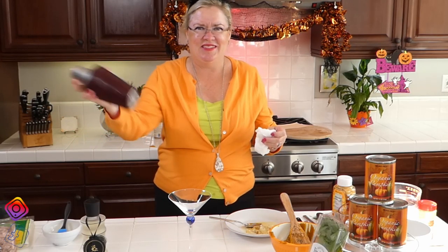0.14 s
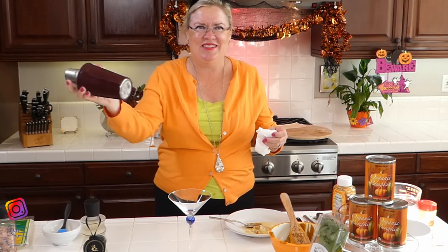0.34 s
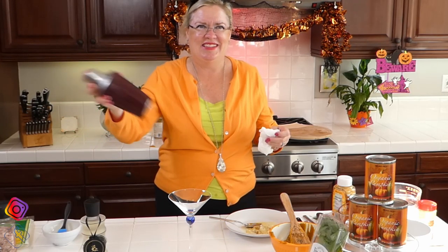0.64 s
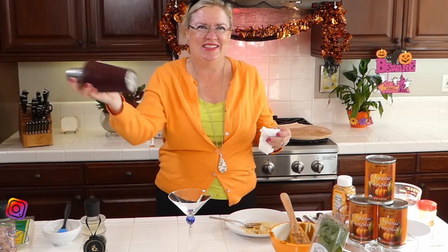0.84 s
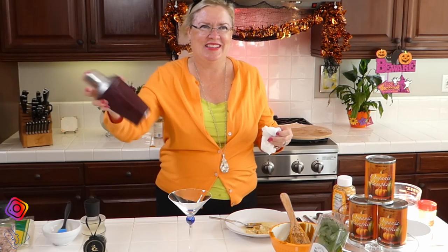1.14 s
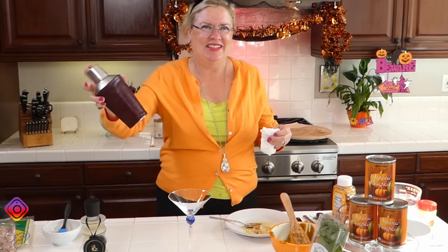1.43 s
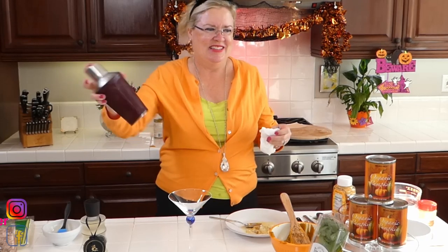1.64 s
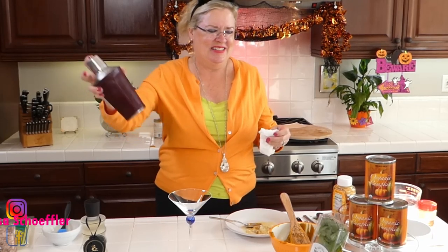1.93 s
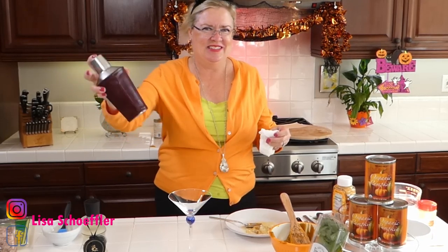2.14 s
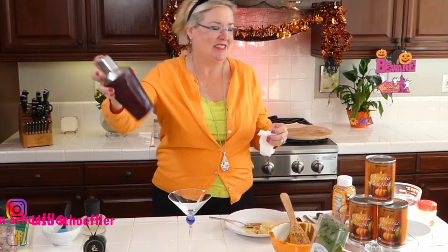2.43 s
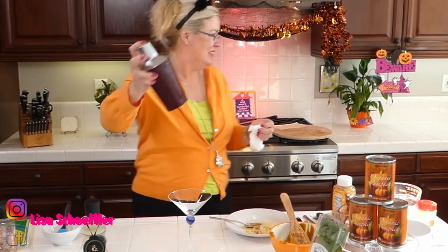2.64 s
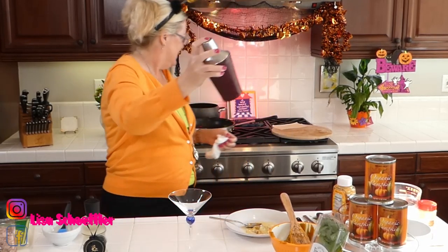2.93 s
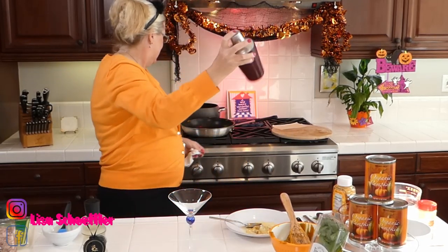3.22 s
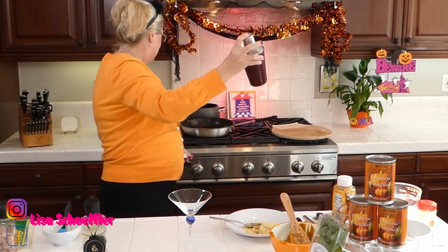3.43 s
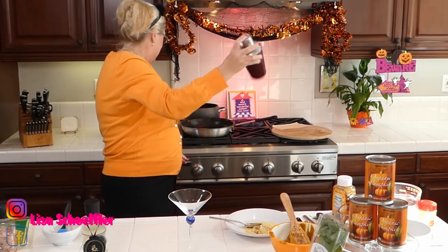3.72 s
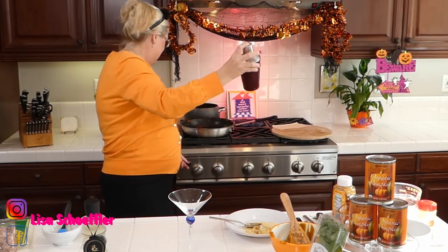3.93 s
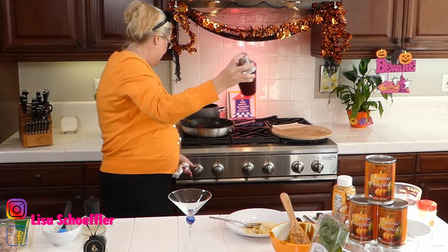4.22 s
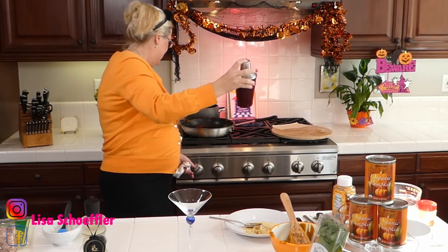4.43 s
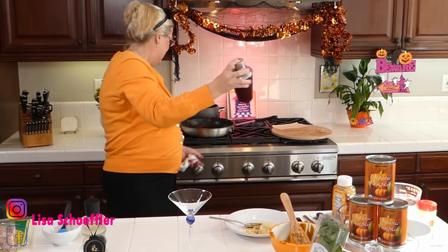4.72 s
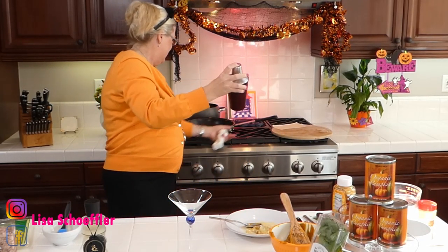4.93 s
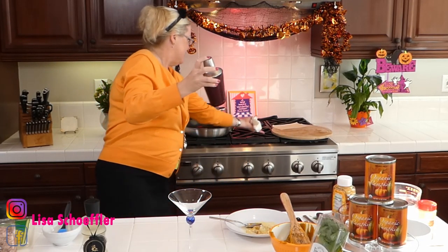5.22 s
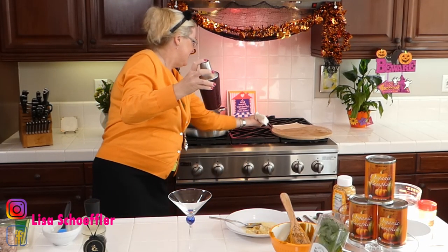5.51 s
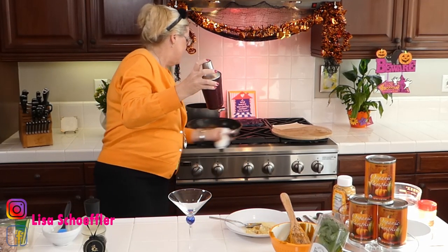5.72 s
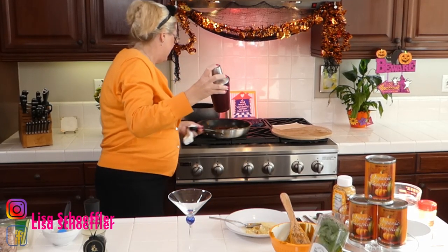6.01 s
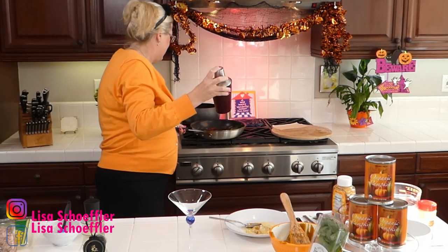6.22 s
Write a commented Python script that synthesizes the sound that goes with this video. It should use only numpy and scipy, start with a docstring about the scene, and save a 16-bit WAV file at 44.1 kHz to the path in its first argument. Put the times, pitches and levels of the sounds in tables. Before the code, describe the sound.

Steady, rapid ice shaking: crunchy clatter alternating between the ends of a cup, sharp knocks against the wall, crisp lid cracks and duller base thuds. It weakens just after five seconds, giving way to a metal pan dragged and bumped on stove bars, ringing and grating until the end. Lively tiled kitchen, low appliance noise underneath, heard a little way off by a camera's stereo microphones.

```python
"""From the start, ice and drink are thrown from end to end of a cocktail shaker, two strokes a shake:
chips patter densely as random contacts ringing wall, lid and base, and cubes knock as short damped tones.
Near the end a frying pan is dragged and bumped over the stove grate; grit and blows drive its modes and rim.
Throughout, a hard tiled kitchen answers with echoes of decaying noise and appliances hum as shaped noise;
a camera's two microphones pick it up with unequally scattered treble and a steep top cut."""
import sys
import numpy as np
from scipy import signal
from scipy.fft import rfft, irfft
from scipy.io import wavfile

SR = 44100
rng = np.random.default_rng(int(sys.argv[2]) if len(sys.argv) > 2 else 0)


def unload_wav(signal):
    """Save mono or channel-first audio to the path in sys.argv[1] as 16-bit WAV at rate SR, clipped to [-1, 1]."""
    wavfile.write(
        sys.argv[1],
        SR,
        np.round(np.clip(np.atleast_2d(signal).T, -1, 1) * 32767).astype(np.int16),
    )


N = 280917  # length [samples]
TIME = np.arange(N) / SR  # [s]

# resonances of the shaker wall: (centre [Hz], width [Hz], level [dB])
WALL_MODES = [(1500, 740, -9), (2130, 755, -0.5), (3160, 630, -2), (4280, 1230, -6)]
# resonances of the lid: (centre [Hz], width [Hz], level [dB])
LID_MODES = [(5580, 5340, -2), (8820, 2200, 1.5), (9590, 1300, 2), (12900, 5300, -13)]
# resonances of the wet base: (centre [Hz], width [Hz], level [dB])
BASE_MODES = [(601, 112, -1.5), (870, 308, 7), (987, 325, 8), (1212, 284, 1)]


def patter():
    """The same contacts shake the whole cup; each part also has contacts of its own."""
    shared = clicks(2500, 0.84)
    wall_ring = unit(ring(shared + 0.88 * clicks(3000, 1.75), WALL_MODES))
    wall = unit(wall_ring + 0.49 * chips())
    lid = unit(ring(shared + 1.87 * clicks(2500, 0.55), LID_MODES))
    base = unit(ring(1.13 * shared + clicks(400, 1.2), BASE_MODES))
    return np.sum(throws() * [wall, lid, base], axis=0)


# throws of the ice to one end of the cup: (first chips land [s], time to the densest patter [s],
# wall level [dB], lid brightness re wall [dB], base thud re wall [dB])
STROKES = [(0, 0.0025, -29.5, -7.5, -14.5), (0.043, 0.029, -29.5, -10.5, -4.5),
           (.181, 0.037, -28.5, -3.5, -9.5), (.27, 0.041, -28, -15, -8), (0.427, 0.027, -27, -6, -16.5),
           (.52, 0.026, -26.5, -11.5, -8.5), (.664, 0.015, -31.5, 2.5, -11), (.75, 0.041, -29, -11.5, -7.5),
           (0.907, 0.018, -27.5, -5, -12), (1.01, 0.018, -30, -7.5, -7.5), (1.147, 0.015, -31, -1.5, -15),
           (1.249, 0.02, -31, -13, -8), (1.385, 0.03, -31.5, -6.5, -10), (1.47, 0.055, -29, -9, -7),
           (1.636, 0.019, -33.5, 0.5, -11.5), (1.729, 0.025, -31.5, -10.5, -6.5),
           (1.857, 0.056, -31, -5.5, -9.5), (1.967, 0.027, -28.5, -9.5, -7.5),
           (2.099, 0.058, -30, -5, -12.5), (2.21, 0.038, -30.5, -13, -5), (2.35, 0.036, -28.5, -6.5, -13.5),
           (2.44, 0.03, -29, -8.5, -8), (2.605, 0.022, -28.5, -4, -23), (2.7, 0.033, -30, -12, -5),
           (2.855, 0.038, -33, -1.5, -11), (2.95, 0.044, -30, -10.5, -6), (3.138, 0.018, -36, -5.5, -10),
           (3.19, 0.076, -29, -12, -5.5), (3.399, 0.021, -32.5, -10, -12), (3.461, 0.043, -28, -11.5, -7.5),
           (3.64, 0.045, -34, -8.5, -12), (3.7, 0.064, -32, -12.5, -7.5), (3.856, 0.084, -29.5, -6.5, -12),
           (3.97, 0.032, -26.5, -11, -8.5), (4.136, 0.02, -30, -6.5, -8.5),
           (4.199, 0.037, -29, -11.5, -7.5), (4.382, 0.011, -33.5, -0.5, -10),
           (4.44, 0.062, -28.5, -12.5, -5.5), (4.62, .04, -31, -10, -12), (4.711, 0.047, -28, -7.5, -10.5),
           (4.891, 0.04, -34, -10, -10), (4.96, 0.059, -31.5, -10.5, -7.5), (5.09, 0.024, -37.5, -19, -6),
           (5.258, 0.0056, -46, -2.5, -24), (5.35, 0.011, -51, -2.5, -18)]
# how fast the patter dies away: (wall [dB/s], lid [dB/s], base [dB/s])
FALL_DB_PER_S = (123.5, 151, 132)
RISE_DB, HOLD_S = 6, 0.004  # climb from first chips to densest patter; how long it stays there


def throws():
    """Patter level on wall, lid and base: each throw climbs, holds, then dies away at a steady rate."""
    power = np.zeros((3, N))
    for start_s, rise_s, wall_db, lid_db, base_db in STROKES:
        i, rise_s = int(start_s * SR), max(rise_s, .003)
        t = TIME[:min(SR // 2, N - i)]
        peak_db = np.array([[wall_db], [wall_db + lid_db], [wall_db + base_db]])
        climb_db = RISE_DB * np.maximum(1 - t / rise_s, 0)
        fall_db = np.outer(FALL_DB_PER_S, np.maximum(t - rise_s - HOLD_S, 0))
        power[:, i:i + len(t)] += undb(peak_db - climb_db - fall_db) ** 2
    return np.sqrt(power)  # overlapping throws add as power


CHIP_LOW_HZ, CHIP_HIGH_HZ, CHIP_Q = 1300, 5216, 14.3  # pitch range of loose chips; sharpness


def chips(count=14):
    """Loose pieces of ice, each with a pitch of its own, tick now and then."""
    total = 0
    for hz in np.geomspace(CHIP_LOW_HZ, CHIP_HIGH_HZ, count):
        level_db = -3 * np.log2(hz / 2000)  # higher pieces are weaker, 3 dB an octave
        total = total + ring(clicks(70, 2.3), [(hz, hz / CHIP_Q, level_db)])
    return unit(total)


# cube knocks on wall and lid: (time [s], level [dB], pitch [Hz], lid crack re knock [dB])
KNOCKS = [(.019, -22, 2340, -23), (.0538, -22, 2130, -15), (.0717, -18, 2130, -7), (.0796, -15, 2300, -4.5),
          (.186, -24, 2990, -3), (.2079, -23, 1980, -9), (.245, -15, 3060, -12), (.429, -37, 2000, -9),
          (.45, -25, 3160, -4), (0.541, -28, 1430, 5), (.5445, -17.5, 2270, 1.5), (0.652, -18, 2050, -6),
          (.6655, -32, 2110, 3), (.6718, -12, 3300, -19), (0.681, -18.5, 4060, 6), (.6875, -24, 3840, 9),
          (0.78, -28, 1720, -8), (0.9108, -14, 4250, -9), (0.9233, -11, 3980, -5.5),
          (1.0313, -23, 2580, 5.5), (1.151, -19, 2960, 6.5), (1.262, -26, 2230, -8), (1.387, -32, 2270, 2),
          (1.4, -20, 3030, -6), (1.4247, -13.5, 2130, -18), (1.506, -23, 1560, -14),
          (1.647, -11, 4000, -12), (1.654, -21, 3150, -16), (1.664, -11, 4300, -6), (1.669, -20, 3630, -12),
          (1.863, -31, 3900, 0), (1.886, -14.5, 4080, -9), (1.913, -16, 4100, -4), (1.983, -21, 1830, 2),
          (1.987, -24, 2370, 1), (2.1134, -27, 3180, 3), (2.1359, -10.5, 3880, -5), (2.245, -22, 1720, -11),
          (2.362, -24, 3130, -1), (2.377, -28, 2320, -5), (2.463, -16, 2320, -15), (2.482, -15, 2460, -4),
          (2.6134, -28, 2230, 5), (2.623, -16, 2040, -6), (2.626, -13, 2860, -1), (2.733, -23, 3300, -10),
          (2.742, -19, 2100, -9), (2.856, -28, 2180, 0), (2.8745, -21, 4400, 7), (2.958, -26, 2140, -7),
          (2.9999, -11, 2130, -15), (3.141, -29, 2710, 4), (3.228, -17.5, 1620, -8), (3.407, -24, 3080, -1),
          (3.4307, -15, 4130, -11), (3.492, -21, 1764, -5), (3.6665, -24.5, 4300, 1),
          (3.73, -21, 1800, -19), (3.753, -16, 2100, -6), (3.8611, -32, 3160, 8), (3.888, -17.5, 4200, 2),
          (3.902, -18, 2020, -13), (3.9173, -16, 2050, -2), (3.923, -11.5, 1880, -3),
          (3.998, -23, 2200, -12), (4.146, -25, 2240, -8), (4.223, -22, 2320, -5), (4.243, -17, 2200, -15),
          (4.387, -24.5, 3040, 10.5), (4.4765, -20, 2180, -4), (4.65, -33, 2220, -2),
          (4.735, -29, 2260, -8), (4.759, -22, 2470, 3), (4.8943, -29.5, 2290, 5), (4.989, -27, 1710, -15),
          (5.015, -25, 2170, 1)]
# hollow knocks on the wet base: (time [s], level [dB], pitch [Hz], ring t60 [s])
THUDS = [(0.07, -29, 1350, 0.035), (0.228, -22, 1100, 0.032), (0.299, -19, 784, 0.023),
         (0.447, -24.5, 1150, 0.026), (0.536, -28, 1140, 0.03), (0.758, -20.5, 815, 0.069),
         (1.022, -9.5, 962, 0.027), (1.088, -23.5, 1140, 0.035), (1.188, -29, 1280, 0.11),
         (1.262, -21, 837, 0.046), (1.409, -31, 786, 0.042), (1.476, -22, 1140, 0.027),
         (1.503, -20, 750, 0.031), (1.748, -26.5, 815, 0.051), (1.888, -28, 746, 0.035),
         (1.964, -24, 744, 0.05), (2.031, -30, 1270, 0.035), (2.135, -29.5, 1150, 0.22),
         (2.246, -22.5, 760, 0.027), (2.458, -26.5, 723, 0.029), (2.622, -23.5, 820, 0.022),
         (2.723, -29, 694, 0.074), (2.942, -32, 790, 0.058), (3.002, -22.5, 904, 0.027),
         (3.015, -28.5, 500, 0.064), (3.206, -22, 810, 0.1), (3.433, -26, 880, 0.05),
         (3.492, -19.5, 860, 0.024), (3.995, -22, 1055, 0.026), (4.225, -29, 970, 0.032),
         (4.444, -25.5, 1136, 0.076), (4.477, -24, 866, 0.063), (4.76, -27, 990, 0.035),
         (4.921, -28, 1256, 0.041), (4.992, -29, 968, 0.083)]
CUBE_CYCLES = 11.4  # the ring of a 0 dB knock is 60 dB down after this many cycles
DAMP_PER_DB = 0.0768  # a harder knock chips the cube and rings shorter
CRACK_S = 0.0016  # decay constant of the crack
SHOWER_DB, SHOWER_S, SHOWER_IN_LID_DB = -3.5, 0.011, -19  # chips behind each cube; decay constant


def knocks():
    """Each cube rings briefly and cracks in the lid; a shower of chips lands behind it."""
    rings, wall_blow, lid_crack = np.zeros((3, N))
    t = TIME[:5000]
    shower = np.exp(-t / SHOWER_S)
    crack = np.exp(-t / CRACK_S) + undb(SHOWER_IN_LID_DB) * shower
    for s, db, hz, crack_db in KNOCKS:
        i = int(s * SR)
        here = slice(i, i + len(t))
        wall_grit, lid_grit = rng.standard_normal((2, len(t)))
        t60 = CUBE_CYCLES / hz * np.exp(-DAMP_PER_DB * db)
        rings[here] += undb(db) * tone(t, hz, t60)
        wall_blow[here] += undb(db + SHOWER_DB) * wall_grit * shower
        lid_crack[here] += undb(db + crack_db) * lid_grit * crack
    for s, db, hz, t60 in THUDS:
        thud = tone(t, hz, t60) + 0.33 * tone(t, 1.5 * hz, 2.0 * t60)
        rings[int(s * SR):][:len(t)] += undb(db) * thud
    return rings + ring(wall_blow, WALL_MODES) + ring(lid_crack, LID_MODES)


def tone(t, hz, t60):
    """A damped ring that needs part of a cycle to build up."""
    decay = np.exp(-np.log(1000) * t / max(t60, .002))
    build_up = 1 - np.exp(-t * hz * 1.53)
    return np.sin(2 * np.pi * hz * t) * decay * build_up


# pan dragged: (time [s], scrape level [dB], rasp brightness re scrape [dB], mode most driven [Hz],
# lead of that mode [dB], boom of the lowest modes [dB])
DRAG = [(5.38, -54, -12, 576, 8, -16), (5.41, -31, -30, 560, 8, -1), (5.468, -26, -25, 564, 8, 3),
        (5.52, -48, -12, 560, 12, 5), (5.598, -44, -29, 500, 10, 0), (5.646, -31, -17, 500, 8, -5),
        (5.66, -18, -15.5, 594, 4, -14), (5.716, -20, -14.5, 595, 6.5, -5),
        (5.76, -25.5, -15, 970, 5.5, 11), (5.82, -29, -10.5, 520, 6, 16), (5.904, -20.5, -18.5, 600, 8, -2),
        (5.94, -19, -3.5, 650, 9, -6), (5.965, -31, 0, 990, 12, 1), (6.06, -26.5, -8, 1540, 7, 9),
        (6.144, -27.5, -10.5, 1560, 7.5, 12), (6.19, -27, -12, 1560, 5, 13),
        (6.236, -23.5, -17, 704, 8.5, 2), (6.316, -19, -14, 734, 12, -8), (6.37, -28, -13.5, 724, 16, -3)]
# pan bumps: (time [s], level [dB], hardness re level [dB], mode most driven [Hz])
BUMPS = [(5.4, -12.5, -30, 586), (5.606, -16, -32, 503), (5.661, -4, -20, 595), (5.741, -13.5, -19, 590),
         (5.847, -12.5, -16.5, 2620), (5.911, -11, -26, 596), (5.929, -14.5, -12, 660),
         (5.945, -2, -19, 1450), (6.051, -12, -18, 1530), (6.09, -15, -17, 1560), (6.149, -36, -11, 1590),
         (6.229, -18.5, -14.5, 660), (6.281, -7, -14.5, 710), (6.319, -13, -21, 732)]
# body modes of the pan: (centre [Hz], width [Hz], level [dB])
PAN_MODES = [(165, 36, -22), (308, 31, -11), (427, 29, -21), (496, 30, -0.5), (544, 70, 1), (644, 78, 0.5),
             (723, 42, -3), (980, 65, -0.5), (1076, 60, -3), (1174, 80, -5.5), (1350, 110, -7.5),
             (1560, 80, -1), (1657, 50, -3.5), (1880, 140, -8), (2300, 71, -3), (2525, 41, -4.5),
             (2620, 31, -10), (2794, 40, -7), (3300, 150, -17.5)]
# bright resonances of its rim: (centre [Hz], width [Hz], level [dB])
RIM_MODES = [(3360, 1460, -4), (4400, 300, 1.5), (5160, 770, -7), (6490, 120, 2), (6540, 520, -6.5),
             (9500, 1400, -6), (10500, 2800, -12)]
BUMP_LEAD_DB, BOOM_BELOW_HZ = 12.5, 350  # how far a bump's driven mode stands out; top of the boom


def pan():
    """Iron rasps on iron and bumps over the bars; both ring the same modes."""
    drag_db, rasp_db, driven_hz, lead_db, boom_db = curves(DRAG)
    rub, t = clicks(4000, 1.5), TIME[:1500]
    burst_shape = np.exp(-t / 0.011) * (1 - np.exp(-t / 0.0013))
    bursts = rng.standard_normal((len(BUMPS), len(t))) * burst_shape
    pushes = .5 * bursts + 9.5 * (t == 0)  # a firm first contact, then grit

    rim_drive = undb(drag_db + rasp_db) * rub
    for (s, db, hard_db, _), burst in zip(BUMPS, bursts):
        rim_drive[int(s * SR):][:len(t)] += undb(db + hard_db) * burst

    body = 0
    for mode in PAN_MODES:
        hz = mode[0]
        scrape = 0.4 * rub + 0.58 * clicks(300, 1.8)
        scrape_gain = undb(drag_db + boom_db * (hz < BOOM_BELOW_HZ))
        drive = scrape_gain * lead(hz, driven_hz, lead_db) * scrape
        for (s, db, _, bump_hz), push in zip(BUMPS, pushes):
            drive[int(s * SR):][:len(t)] += undb(db) * lead(hz, bump_hz, BUMP_LEAD_DB) * push
        body = ring(drive, [mode]) - body  # neighbouring modes take opposite signs
    body_scale = np.std(ring(rub, PAN_MODES))
    rim_scale = np.std(ring(rub, RIM_MODES))
    return body / body_scale + ring(rim_drive, RIM_MODES) / rim_scale


def lead(hz, driven_hz, lead_db):
    """Where the pan touches decides which mode it drives hardest."""
    closeness = np.exp(-(np.log(hz / driven_hz) / 0.078) ** 2)
    return undb(lead_db * (closeness - 1))


ROOM_DB = -3  # gain of the echoes


def kitchen(x, count=4):
    """The source keeps moving, so its echoes pass from one place's tail to the next."""
    turn = np.pi * TIME / .35  # one round of the places takes 0.7 s
    echoes = 0
    for k in range(count):
        place = np.maximum(np.cos(turn - 2 * np.pi * k / count), 0)
        echoes = echoes + signal.fftconvolve([x * place], tail(), axes=1)[:, :N]
    return x + undb(ROOM_DB) * echoes


# echo bands: (centre [Hz], t60 [s], level [dB], left-right likeness [-1 to 1])
ROOM_BANDS = [(500, 0.45, -2, 0.62), (1450, 0.37, 2.5, 0.69), (4270, 0.25, -5, 0.69),
              (9400, 0.18, -1, 0.41), (12700, 0.08, 7, 0.23)]


def tail():
    """One place's echoes at left and right: bands of noise, each with its own decay and likeness."""
    t, pair = TIME[:SR // 2], 0
    for hz, t60, db, alike in ROOM_BANDS:
        noise = rng.standard_normal((2, len(t)))
        mid, side = signal.lfilter(*signal.iirpeak(hz, .8, fs=SR), noise)
        both = np.sqrt(1 + alike) * mid + np.sqrt(1 - alike) * side * np.array([[1], [-1]])
        pair = pair + undb(db) * both * np.exp(-np.log(1000) * t / t60)
    return pair * (t > .004) / np.linalg.norm(pair[0])  # echoes start after 4 ms


# spectrum shape of the appliance noise: (frequency [Hz], relative level [dB])
HUM_SPECTRUM = [(15, -51), (25, -32), (86, -15.5), (160, -13.5), (193, -6), (313, -2), (349, -5), (421, 2),
                (457, 0), (509, -3.5), (804, -2), (2300, -3), (15500, -26)]
# stereo spread of that noise: (frequency [Hz], side minus mid [dB])
HUM_SIDE = [(30, 5), (150, 9), (300, 2.5), (600, 2), (5000, -12), (14000, -8)]
# swell of the bass hum before its final trim: (time [s], level [dB])
HUM_SWELL = [(0, -67), (2.87, -66.5), (3.58, -58.5), (5.25, -63), (5.68, -58), (6.37, -71)]
HUM_DB = -46  # level of the noise's mid before the left trim


def hum():
    """Appliance noise with a swelling bass, which reaches the two microphones out of step."""
    hz = np.maximum(np.arange(N // 2 + 1) * SR / N, 1)
    mid, side = (rfft(rng.standard_normal(N)) * undb(on_log(hz, HUM_SPECTRUM)) for _ in range(2))
    mid, side = irfft(mid, N), irfft(side * undb(on_log(hz, HUM_SIDE)), N)
    noise = undb(HUM_DB) / np.std(mid) * np.array([mid + side, mid - side])

    narrow = ring(rng.standard_normal((2, N)), [(123, 29, 0), (246, 59, 0.5)])
    bass = unit(ring(narrow, [(175, 710, 0)])) * undb(curves(HUM_SWELL)[0])
    bass = bass[0] + 2.1 * bass[1] * np.array([[1], [-1]])  # the side outweighs the mid
    return (noise + 0.96 * bass) * np.array([[.8], [1]])


def clicks(per_s, spread_db):
    """Random contacts, mostly small with a few large ones."""
    size = undb(spread_db * np.minimum(rng.exponential(size=N), 5)) * rng.standard_normal(N)
    return unit(size * (rng.random(N) < per_s / SR))


def ring(x, modes):
    """Sum of resonances with alternating sign."""
    total = 0
    for k, (hz, width, db) in enumerate(modes):
        resonance = signal.lfilter(*signal.iirpeak(hz, hz / width, fs=SR), x)
        total = total + (-1) ** k * undb(db) * resonance
    return total


def curves(table):
    """Columns read at every sample; the level is silent outside the table."""
    s, level_db, *rest = np.transpose(table)
    return [np.interp(TIME, s, level_db, -120, -120)] + [np.interp(TIME, s, c) for c in rest]


def on_log(hz, table):
    """Levels [dB] read from a table along log frequency."""
    table_hz, level_db = np.transpose(table)
    return np.interp(np.log(hz), np.log(table_hz), level_db)


def undb(db):
    """Decibels to amplitude gain."""
    return 10 ** (np.asarray(db) / 20)


def unit(x):
    """Scale to an RMS of one."""
    return x / np.sqrt(np.mean(x ** 2))


# stereo balance: (time [s], left minus right [dB])
BALANCE_DB = [(0, 0.5), (2.5, 0), (6.37, -0.7)]


def scene():
    """Shaker and pan sound in the kitchen, over the hum."""
    # little sounds below about 330 Hz from the shaker and below about 130 Hz from the pan
    small, wide = (signal.butter(3, hz, "high", fs=SR, output="sos") for hz in (330, 130))
    near = signal.sosfilt(small, patter() + knocks()) + signal.sosfilt(wide, pan())
    side_db = np.interp(TIME, *np.transpose(BALANCE_DB))
    gain_db = -1.5 + np.array([side_db, -side_db]) / 2
    return undb(gain_db) * kitchen(near) + hum()


TOP_HZ = 15800  # edge of the steep top cut


def record(dry):
    """The camera body scatters treble unequally onto its two microphones; the top is cut steeply."""
    high = signal.butter(2, 9000, "high", fs=SR, output="sos")
    treble = signal.sosfilt(high, dry.mean(axis=0))
    bounce = rng.standard_normal(600) * np.exp(-TIME[:600] / 0.003)
    scattered = undb(-7.5) * np.convolve(treble, bounce / np.linalg.norm(bounce))[:N]
    top_cut = signal.ellip(10, .2, 80, TOP_HZ, fs=SR, output="sos")
    return signal.sosfilt(top_cut, dry + [scattered, -scattered])


dry = scene()
out = record(dry)
unload_wav(out)
```